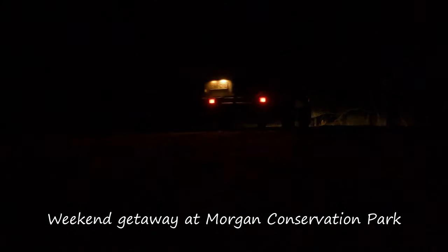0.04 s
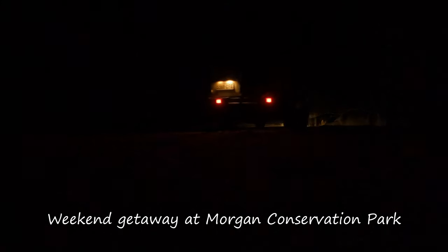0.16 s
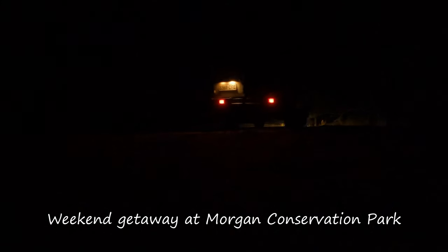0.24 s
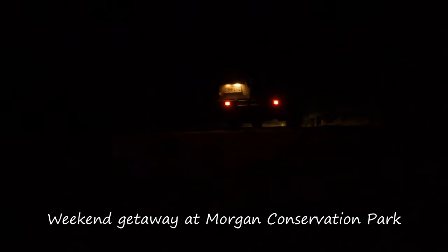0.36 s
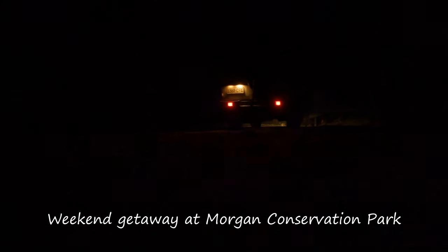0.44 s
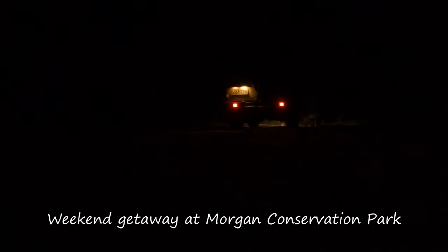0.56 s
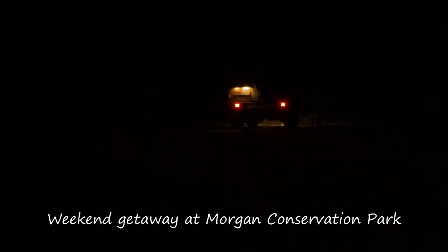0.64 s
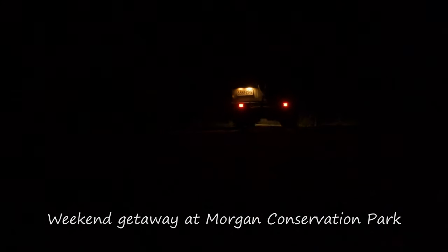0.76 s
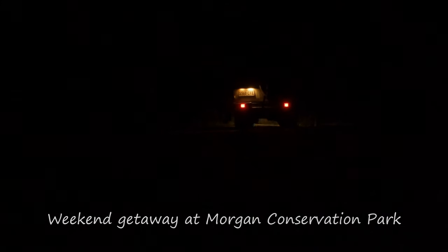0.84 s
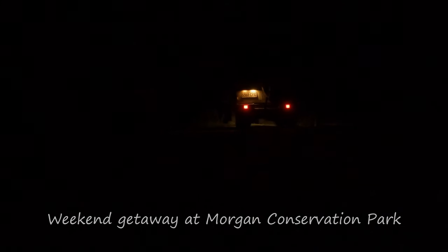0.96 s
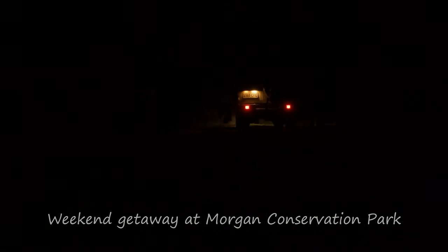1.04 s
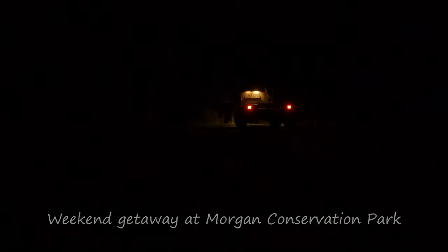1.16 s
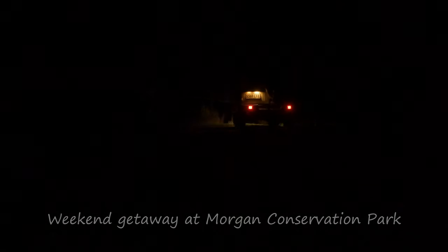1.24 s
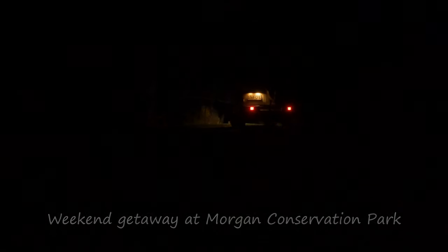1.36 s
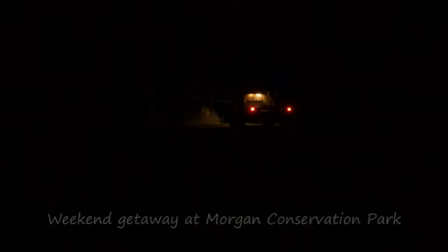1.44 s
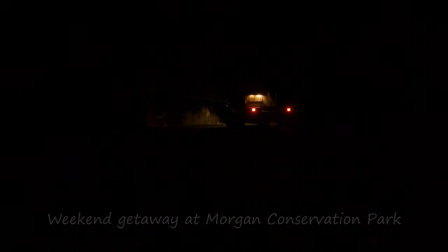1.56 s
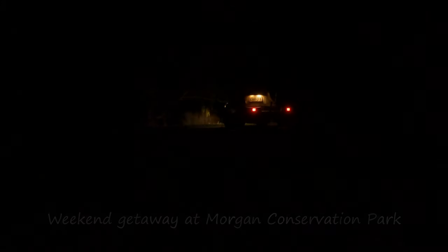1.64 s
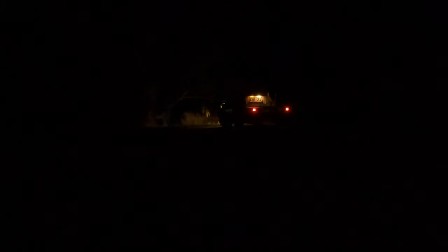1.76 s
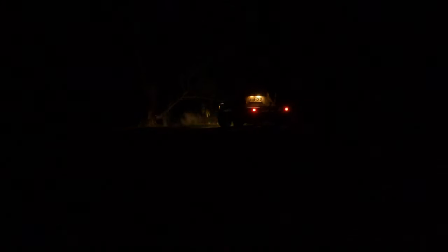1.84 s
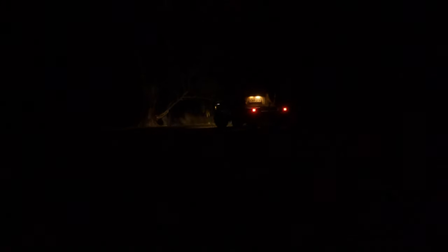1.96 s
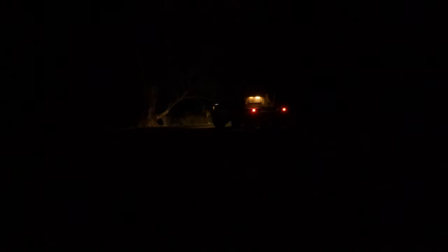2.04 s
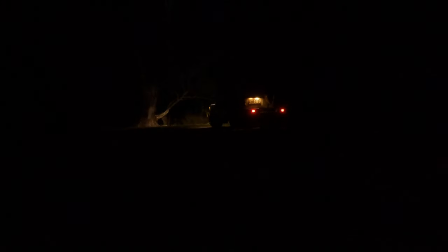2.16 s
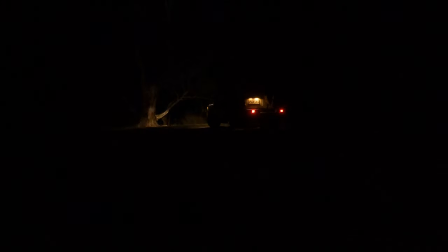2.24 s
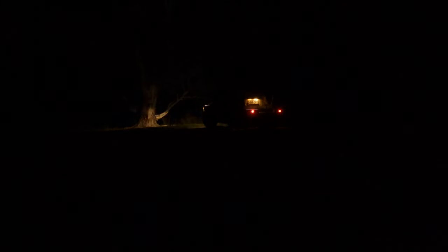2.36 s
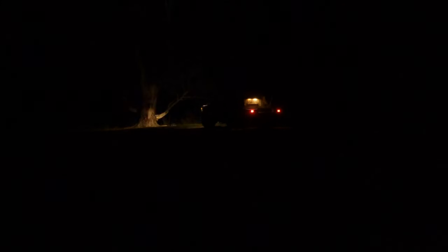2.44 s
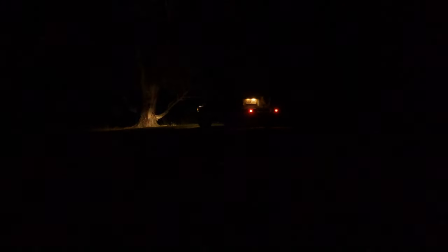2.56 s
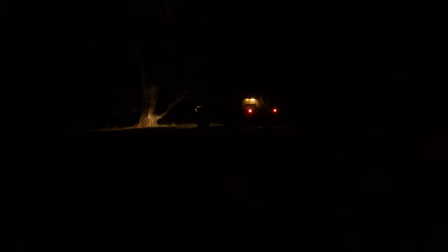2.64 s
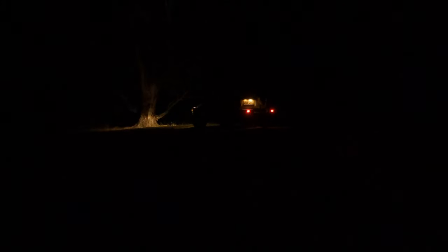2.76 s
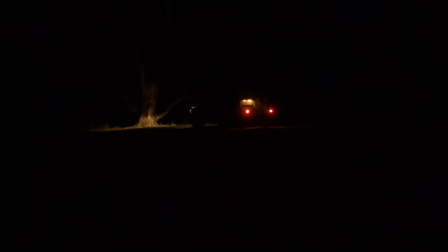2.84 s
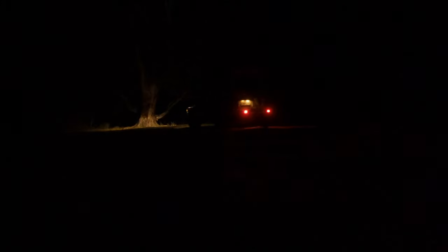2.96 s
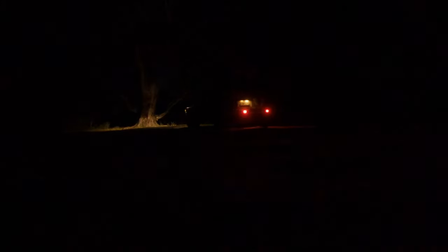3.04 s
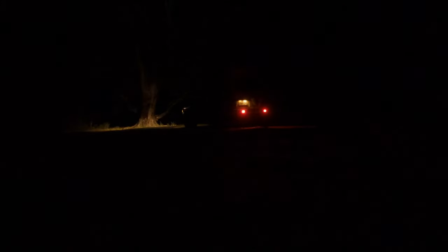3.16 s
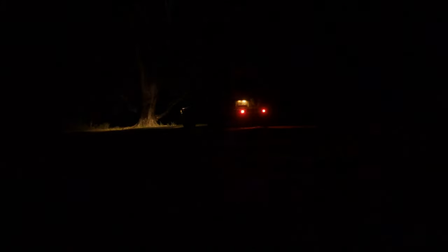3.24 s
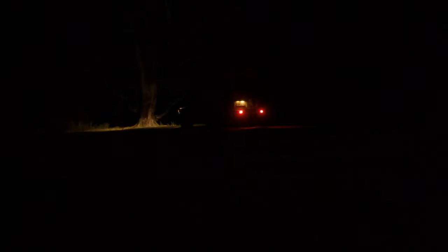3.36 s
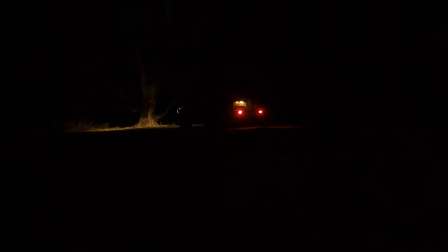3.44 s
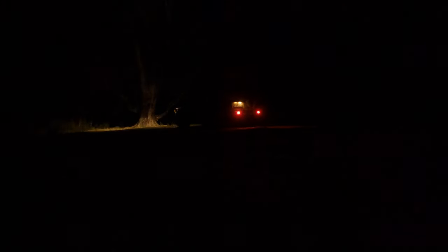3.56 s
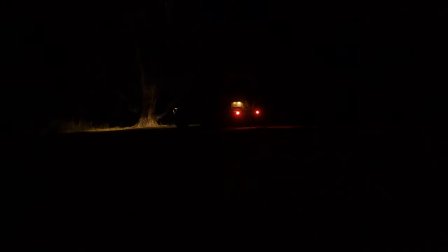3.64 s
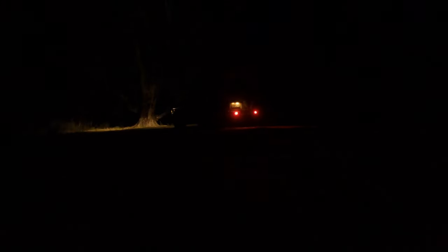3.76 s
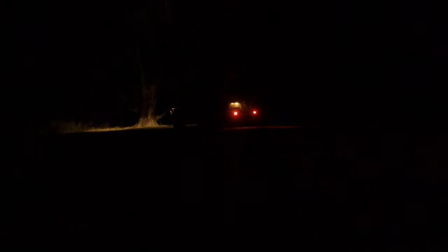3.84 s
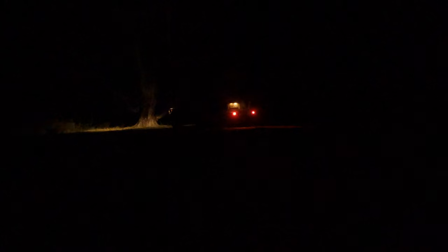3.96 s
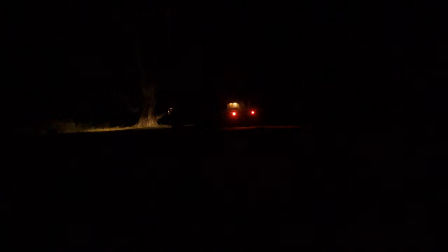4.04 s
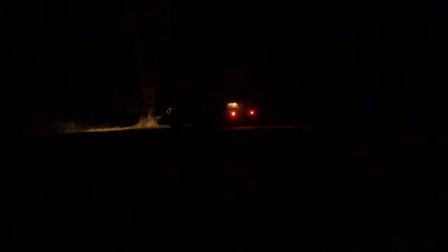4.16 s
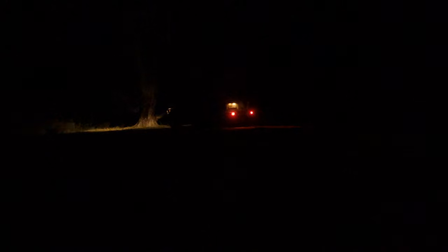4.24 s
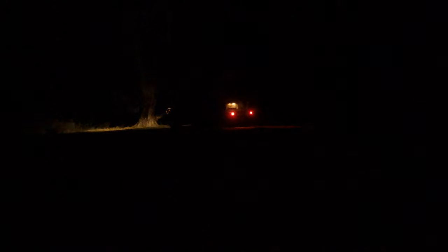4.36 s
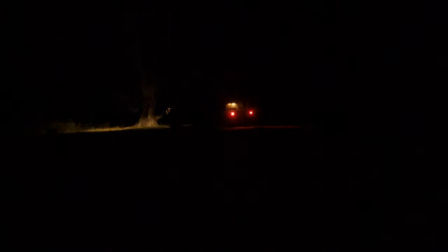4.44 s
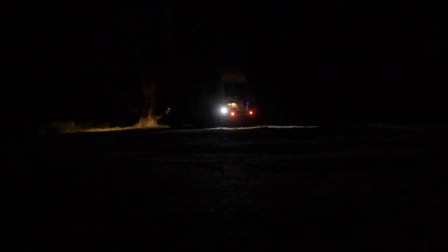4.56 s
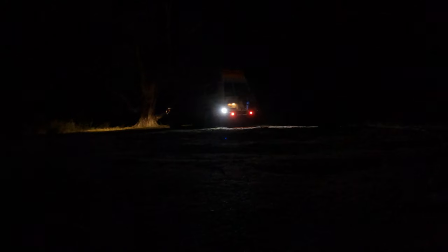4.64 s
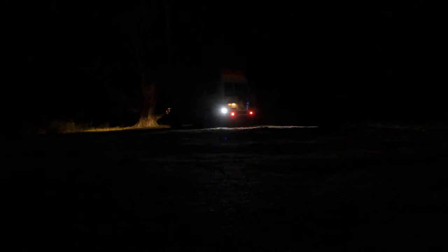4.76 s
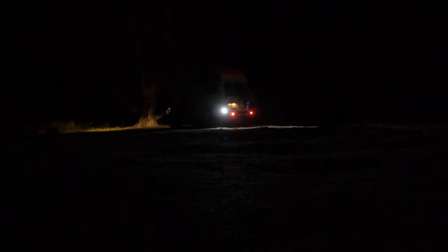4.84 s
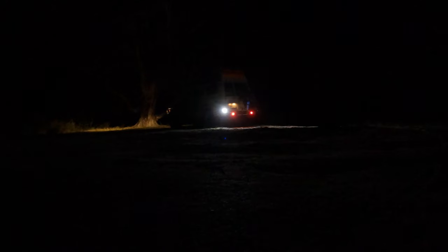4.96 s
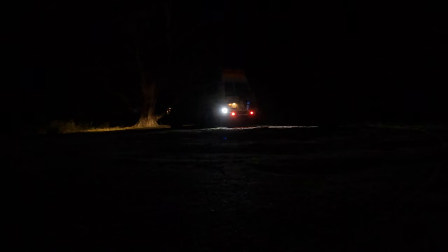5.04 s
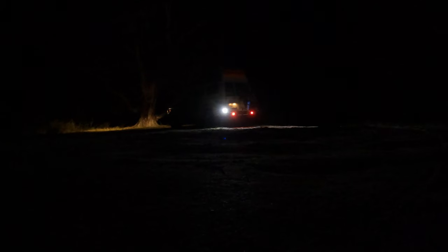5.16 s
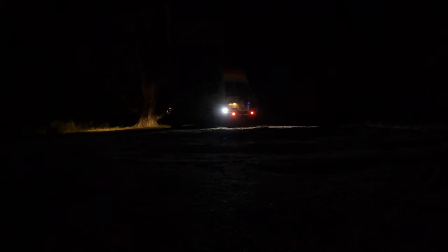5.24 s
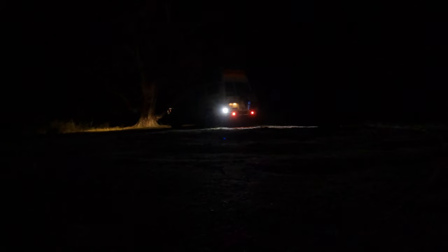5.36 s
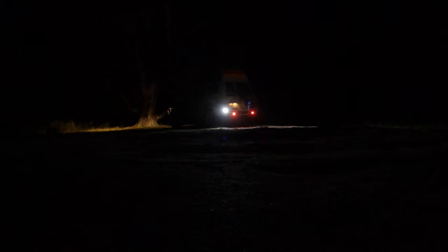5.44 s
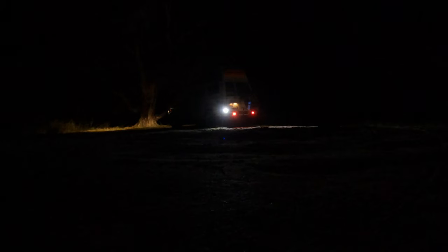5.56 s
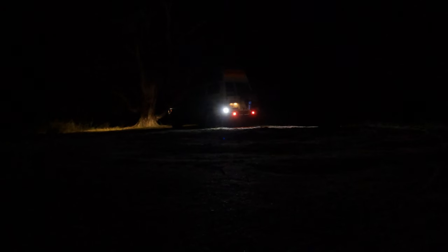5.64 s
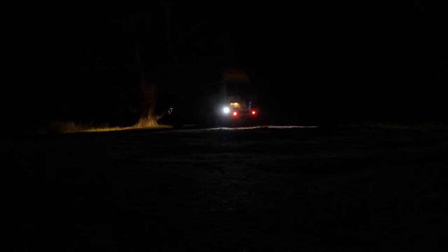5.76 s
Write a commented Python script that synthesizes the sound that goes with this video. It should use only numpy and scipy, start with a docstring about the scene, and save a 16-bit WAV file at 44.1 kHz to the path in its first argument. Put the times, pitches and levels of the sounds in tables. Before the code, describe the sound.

A camper van's engine booms slowly away at night, drops to a loping idle, something loose clatters, then it begins to pull again.

```python
"""A six-cylinder camper van creeps over a campsite at night: its exhaust booms under load, drops to a
loping idle and pulls again. The engine is summed cosines at multiples of the four-stroke cycle; a weak
cylinder makes it throb once a cycle. Machinery, tyres, rumble and night hiss are coloured noise.
Something loose clatters once (noise knocks, ringing panel modes); dry ticks are short noise bursts."""
import sys
import numpy as np
from scipy import signal
from scipy.fft import rfft, irfft, next_fast_len
from scipy.io import wavfile
from scipy.ndimage import map_coordinates

SR = 44100
rng = np.random.default_rng(int(sys.argv[2]) if len(sys.argv) > 2 else 0)


def digitize_waveform(pressure):
    """Quantize a signal to 16-bit integers and store it at the path in sys.argv[1].

    Rows of a 2-D input are taken as channels; values are limited to [-1, 1].
    """
    field = np.atleast_2d(pressure).T
    bounded = np.clip(field, -1, 1)
    quanta = np.round(bounded * 32767).astype(np.int16)
    wavfile.write(sys.argv[1], SR, quanta)


N = 255339

CYLINDERS = 6
# clean exhaust notes: [multiple of the four-stroke cycle]
NOTE_MULTIPLES = [6, 9, 12, 18, 24]
# resonances of panels and casings: [f/Hz, width/Hz, boost/dB]
BODY_MODES = [(414, 4.9, -0.5), (650, 18, -0.5), (940, 97, 2.5), (1296, 72, 2.5), (2080, 25, 9),
              (2210, 27, 7), (2700, 36, 2.5)]


def amp(db):
    """Decibels to gain."""
    return 10 ** (np.asarray(db) / 20)


def unit(x):
    """Scale to rms 1."""
    return x / np.sqrt(np.mean(x ** 2) + 1e-20)


def along(points, hz):
    """Interpolate (f/Hz, value) points on a log frequency axis."""
    f, v = np.transpose(points)
    return np.interp(np.log(hz + 1), np.log(f + 1), v)


def curves(rows):
    """One value per sample for each column after the time."""
    t_s, *cols = np.transpose(rows)
    return [np.interp(np.arange(N) / SR, t_s, c) for c in cols]


def wobble(knots_per_s, size=N):
    """Smooth random curve spanning the whole scene in size samples."""
    coarse = np.linspace(0, 1, 2000)
    knots = rng.standard_normal(1000)
    smooth = map_coordinates(knots, [coarse * knots_per_s * N / SR], mode="wrap")
    return np.interp(np.linspace(0, 1, size), coarse, smooth)


def filtered(x, response):
    """Apply a gain that is a function of frequency in Hz."""
    m = next_fast_len(N + SR // 4)
    return irfft(rfft(x, m) * response(np.fft.rfftfreq(m, 1 / SR)), m)[..., :N]


def boosts(modes, hz):
    """Decibels that a set of resonances adds at each frequency."""
    return sum(db / (1 + (2 * (hz - f) / w) ** 2) for f, w, db in modes)


def noise(spectrum, modes=()):
    """Coloured stereo noise of rms 1; mid and side shares set the left-right likeness."""
    # stereo likeness: [f/Hz, left-right correlation]
    likeness = [(200, 0.95), (500, 0.92), (1000, 0.92), (2000, 0.73), (4500, 0.5), (10000, 0.58)]

    def mid_side_gain(hz):
        colour = amp(along(spectrum, hz) + boosts(modes, hz))
        turn = np.arccos(np.clip(along(likeness, hz), -1, 1)) / 2
        return colour * [np.cos(turn), np.sin(turn)]

    mid, side = filtered(rng.standard_normal((2, N)), mid_side_gain)
    return unit(np.array([mid + side, mid - side]))


def panned(x, left_db):
    """Left-right level difference in dB, split evenly."""
    return x * amp([[left_db / 2], [-left_db / 2]])


def add(track, t_s, piece):
    """Lay a piece into a track at time t_s."""
    room = track[round(t_s * SR):][:len(piece)]
    room += piece[:len(room)]


def decay(t60_s, attack_s):
    """Half a second of quick rise and exponential fall."""
    t = np.arange(SR // 2) / SR
    return (1 - np.exp(-t / attack_s)) * np.exp(-np.log(1000) * t / t60_s)


def throttle_db():
    """The engine sinks as the throttle shuts and lugs as it opens."""
    # throttle changes: [t/s, level/dB, onset/s, recovery/s]
    changes = [(2.749, -7, 0.053, 0.15), (5.461, 3.5, 0.077, .06)]
    t = np.arange(N) / SR
    return sum(db * np.exp(-abs(t - s) / np.where(t < s, onset, recovery))
               for s, db, onset, recovery in changes)


def nearness_db():
    """Early lift, lost as the van draws away."""
    start_db, recede_s = 10, 0.62
    return start_db * np.exp(-np.arange(N) / SR / recede_s)


def pipe_phase(hz):
    """Phase in rad: lines below the 127 Hz boom of the pipe lead, lines above it lag."""
    return np.arctan((127 - hz) / 9)


def exhaust(cycles, cycle_hz, load):
    """Clean notes at multiples of the cycle, set by load and swelling where they cross a pipe boom."""
    # base rms of the notes, a row per multiple: [level at idle/dB, level at full load/dB]
    note_levels = [(-33.5, -30), (-52, -30.5), (-33.5, -33.5), (-34, -34.5), (-47.5, -44.5)]
    # booms of the pipe: [f/Hz, half width/Hz, boost/dB]
    booms = [(76.1, 4.2, 6), (127.43, 7.62, 17.5)]
    waver_db, waver_knots_per_s = 0.48, 7.9
    out = np.zeros(N)
    for k, (idle_db, full_db) in zip(NOTE_MULTIPLES, note_levels):
        hz = k * cycle_hz
        note_db = idle_db + (full_db - idle_db) * load + waver_db * wobble(waver_knots_per_s)
        note_db += sum(db / (1 + ((hz - f) / w) ** 4) for f, w, db in booms)
        out += amp(note_db) * np.cos(2 * np.pi * k * cycles + pipe_phase(hz))
    return np.sqrt(2) * out  # rms to peak


def lope(cycles, cycle_hz, colour, pipe, firing_db, drift_rad, weak_cylinder):
    """Lines between the notes; near the boom they cancel the notes when the weak cylinder fires."""
    step = 12  # low lines need few samples
    cycles, cycle_hz = cycles[::step], cycle_hz[::step]
    hz = np.arange(1500.)
    line_db = along(colour, hz) + boosts(pipe, hz)
    low = 1 / (1 + (hz / 225) ** 8)
    out = np.zeros(len(cycles))
    for k in np.setdiff1d(np.arange(4, 160), NOTE_MULTIPLES):
        line_hz = k * cycle_hz
        # low multiples of the firing rate stand out
        gain = np.interp(line_hz, hz, amp(line_db + firing_db * low * (k % CYLINDERS == 0)))
        # pipe reflections scramble the higher lines; no two cycles are quite alike
        scramble = rng.uniform(-np.pi, np.pi) * (k > 25)
        wander = drift_rad * k * wobble(6, size=len(cycles))
        turn = 2 * np.pi * k * (cycles - weak_cylinder / CYLINDERS)
        out -= gain * np.cos(turn + pipe_phase(line_hz) + scramble + wander)
    return signal.resample_poly(out, step, 1, window=("kaiser", 10))[:N]


def engine(cycles, cycle_hz, load):
    """Exhaust notes plus throb; load fades idling into pulling and brings out the upper lines."""
    # pipe colour of the lines under load, before throb gain: [f/Hz, peak level/dB]
    loaded_colour = [(20, -68.5), (33, -55), (50, -56.5), (75, -45.5), (92, -63), (112, -63), (129, -29.5),
                     (138, -39.5), (160, -40.5), (222, -50), (290, -55), (420, -68.5), (750, -79),
                     (1150, -87)]
    # the same at idle: [f/Hz, peak level/dB]
    idle_colour = [(20, -68.5), (50, -57.5), (85, -58.5), (108, -45), (115, -34.5), (128, -41.5),
                   (137, -38), (148, -54.5), (200, -57.5), (240, -54), (300, -59), (425, -63.5),
                   (520, -73.5), (900, -90.5)]
    # standing waves that ring under load: [f/Hz, width/Hz, boost/dB]
    loaded_modes = [(252.3, 9, 21), (278.5, 6.7, 3.5), (371.7, 14, 16), (497, 18, 21), (620, 24, 16),
                    (734, 23, 13.5), (982, 23, 17)]
    # standing waves that ring at idle: [f/Hz, width/Hz, boost/dB]
    idle_modes = [(161.5, 18, 5.5), (195.7, 4.8, 12), (294.6, 2.7, 10.5), (350, 8, 8.5), (431.8, 3.3, 10),
                  (497, 16, 7.5), (656, 16, 16)]
    throb_db, throb_load_power = 1.5, 1.23
    idle_throb_db, idle_fade_power = -0.5, 1
    # upper lines: level at full load, change per unit load, share of the early lift, lower edge
    bark_db, bark_load_db, bark_near, bark_hz = 1, 14, 0.6, 340

    loaded = lope(cycles, cycle_hz, loaded_colour, loaded_modes,
                  firing_db=5.0, drift_rad=0.007, weak_cylinder=1)
    idling = lope(cycles, cycle_hz, idle_colour, idle_modes,
                  firing_db=10.5, drift_rad=0.0056, weak_cylinder=4)
    low = filtered(loaded, lambda hz: 1 / (1 + (hz / bark_hz) ** 10))
    bark = amp(bark_db + bark_load_db * (load - 1) + bark_near * nearness_db()) * (loaded - low)
    throb = amp(throb_db) * load ** throb_load_power * (low + bark)
    throb += amp(idle_throb_db) * (1 - load) ** idle_fade_power * idling
    return panned(amp(throttle_db()) * (exhaust(cycles, cycle_hz, load) + throb), left_db=0.3)


def firing_beat(cycles):
    """Cosine at the firing rate, six to a cycle."""
    return np.cos(2 * np.pi * CYLINDERS * cycles)


def machinery(cycles, load):
    """Noise through casing resonances, beating with the firings and rising with load."""
    # machinery colour: [f/Hz, density/dB per Hz]
    spectrum = [(30, -11), (60, 0), (130, 11.5), (200, -1.5), (300, -1), (400, -6.5), (550, -10.5),
                (800, -19), (1500, -46), (3000, -91)]
    idle_db, load_db, near_share, throttle_share = -44.5, 5, 0.41, 0.29
    level_db = idle_db + load_db * load + near_share * nearness_db() + throttle_share * throttle_db()
    level_db += 0.58 * firing_beat(cycles) + 2.7 * wobble(9.9)
    return panned(amp(level_db) * noise(spectrum, BODY_MODES), left_db=-3.5)


def tyres(cycles, load):
    """Uneven crunch: noise with a fast random level and a firing-rate beat."""
    # tyre colour: [f/Hz, density/dB per Hz]
    spectrum = [(200, -35), (600, -4), (1000, 3.5), (1400, 1.5), (1750, -2), (2150, -13), (2800, -11),
                (3600, -19.5), (6000, -21), (12000, -56)]
    rolling_db, load_db = -61.5, 1.6
    level_db = rolling_db + load_db * load + nearness_db()
    level_db += 1.1 * firing_beat(cycles) + 1.4 * wobble(45)
    return panned(amp(level_db) * noise(spectrum, BODY_MODES), left_db=-1.6)


def rumble(load):
    """Low noise that swells slowly and follows the throttle."""
    spectrum = [(4, -13.0), (12, 1.5), (28, -5.5), (60, 0.0), (200, -36.5), (800, -100)]  # f/Hz, dB per Hz
    idle_db, load_db, swell_db = -43, -2, 4
    return amp(idle_db + load_db * load + swell_db * wobble(2) + throttle_db()) * noise(spectrum)


def clatter():
    """A run of noise knocks and scrapes rings panel modes; the trees answer with a soft tail."""
    # loose clatter: [t/s, level/dB, scrape re level/dB]
    knocks = [(3.219, -56.5, -20), (3.722, -63, -23), (4.717, -36.5, -25), (4.733, -39, -22.5),
              (4.753, -36, -21), (4.765, -40.5, -25), (4.801, -40.5, -5.5), (4.835, -44.5, -14),
              (5.032, -45, -13.5)]
    # panel modes, before random spread: [f/Hz, relative level/dB, t60/s]
    panel_modes = [(263, 0, 0.34), (418, 6.5, 0.11), (682, -4.5, 0.094), (976, -2, 0.031),
                   (1080, -5, 0.078), (1190, -7.5, 0.04), (2270, -11.5, 0.042), (2680, -15, .05)]
    # knock colour: [f/Hz, density/dB per Hz]
    knock_colour = [(150, -27.5), (400, 3.5), (1100, 4.5), (1750, -6), (2300, -6), (3300, -16),
                    (5000, -28.5), (9000, -42.5)]
    # scrape colour: [f/Hz, density/dB per Hz]
    scrape_colour = [(1000, -22), (3000, 2.5), (5500, 4), (8000, -4.5), (10500, -10.5), (14000, -20.5)]
    knock_t60_s, ring_db, tail_db = 0.068, 2.5, -16.5
    knock, scrape, ring, tail = np.zeros((4, N))
    t = np.arange(SR // 2) / SR
    for t_s, db, scrape_db in knocks:
        add(knock, t_s, amp(db) * decay(knock_t60_s, attack_s=0.00041))
        add(scrape, t_s, amp(db + scrape_db) * decay(knock_t60_s, attack_s=0.0013))
        add(tail, t_s, amp(db + tail_db) * decay(0.51, attack_s=0.02))
        for hz, mode_db, t60_s in panel_modes:
            gain = amp(db + ring_db + mode_db + rng.normal(0, 2))
            tone = np.sin(2 * np.pi * (hz * t + rng.random()))
            add(ring, t_s, gain * decay(t60_s, attack_s=0.0036) * tone)
    hits = knock * noise(knock_colour) + scrape * noise(scrape_colour)
    return panned(hits + ring + tail * noise(knock_colour), left_db=-0.7)


def ticks():
    """Tiny dry snaps close by: noise under fast decays."""
    # dry ticks: [t/s, level/dB, t60/s]
    snaps = [(.428, -56, .05), (0.779, -60, 0.012), (1.244, -57, 0.0034), (1.662, -66.5, 0.082),
             (2.837, -58, 0.026), (2.866, -62, 0.061), (3.801, -52, 0.013), (3.806, -45.5, 0.0066),
             (3.817, -44.5, .003), (3.858, -56.5, 0.015)]
    # tick colour: [f/Hz, density/dB per Hz]
    spectrum = [(2000, -16.5), (4000, -1), (6000, 2.5), (8000, 2), (11000, 0.5), (14000, -7)]
    level = np.zeros(N)
    for t_s, db, t60_s in snaps:
        add(level, t_s, amp(db) * decay(t60_s, attack_s=0.00024))
    return panned(level * noise(spectrum), left_db=-3.5)


def night(cycles):
    """Background hiss: noise that flickers at random and beats with the firings."""
    # hiss base level: [t/s, level/dB]
    hiss_levels = [(0, -64), (.4, -70.5), (.7, -73), (1.4, -74.5), (2.2, -73), (3.1, -68.5), (5.4, -68.5),
                   (5.79, -66.5)]
    # hiss colour: [f/Hz, density/dB per Hz]
    spectrum = [(500, -21.5), (2000, -2.5), (2900, 3.5), (3900, -5.5), (5200, -0.5), (7300, -3),
                (8700, -10), (10200, -7), (12000, -15), (14000, -21)]
    level_db = curves(hiss_levels)[0] + 1.3 * firing_beat(cycles) + 1.6 * wobble(79)
    return panned(amp(level_db) * noise(spectrum), left_db=1.4)


def scene():
    """Speed and load drive the van; one four-stroke cycle takes two turns of the crankshaft."""
    # engine speed: [t/s, crankshaft speed/rpm]
    speed = [(0, 841), (.55, 817), (1.18, 829), (1.45, 801), (1.7, 849), (2.04, 776), (2.13, 816),
             (2.25, 776), (2.36, 783), (2.46, 810), (2.64, 807), (2.78, 663), (3.7, 645), (4.1, 662),
             (5.38, 640), (5.55, 704), (5.79, 759)]
    # the driver pulls, eases off, lets it idle and pulls again: [t/s, load/0-1]
    pull = [(0, 0.82), (1.2, 0.96), (1.45, 0.81), (1.68, 0.95), (2, 0.71), (2.57, 0.66), (2.75, 0.03),
            (5.36, 0), (5.55, 0.14), (5.79, 0.44)]
    cycle_hz = curves(speed)[0] / 120
    cycles = np.cumsum(cycle_hz) / SR
    load = np.clip(curves(pull)[0], 0, 1)
    van = engine(cycles, cycle_hz, load) + machinery(cycles, load) + tyres(cycles, load) + rumble(load)
    return van + clatter() + ticks() + night(cycles)


def record(dry):
    """Fade in and out over 4 ms, then cut everything above the band limit."""
    top_hz = 14200
    opening = np.minimum(np.arange(N) / (0.004 * SR), 1)
    return filtered(dry * opening * opening[::-1], lambda hz: hz < top_hz)


dry = scene()
out = record(dry)
digitize_waveform(out)
```